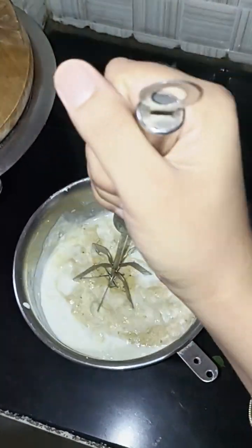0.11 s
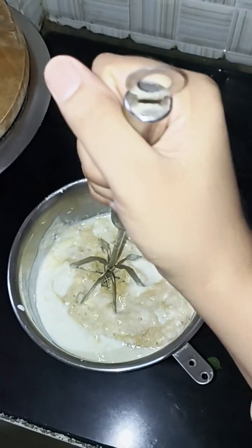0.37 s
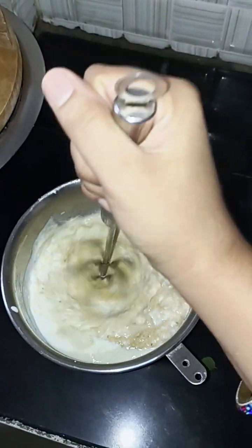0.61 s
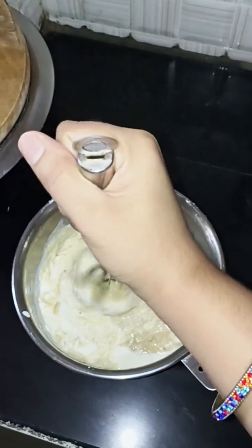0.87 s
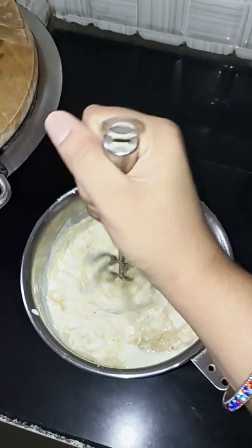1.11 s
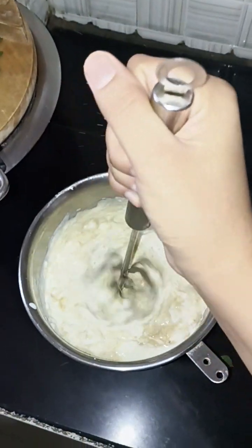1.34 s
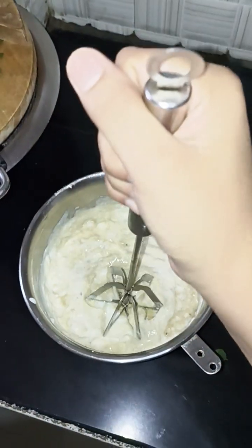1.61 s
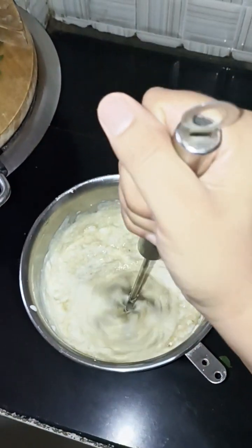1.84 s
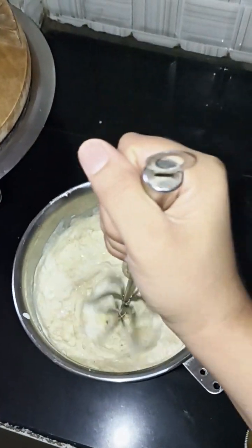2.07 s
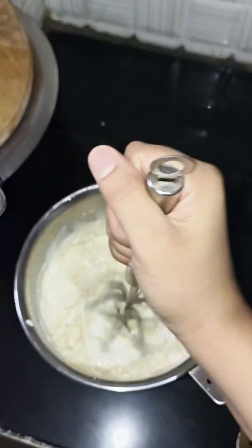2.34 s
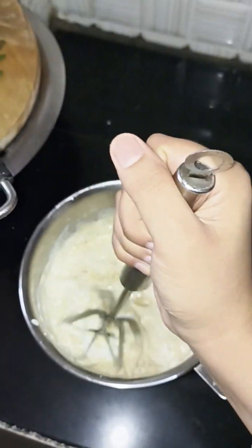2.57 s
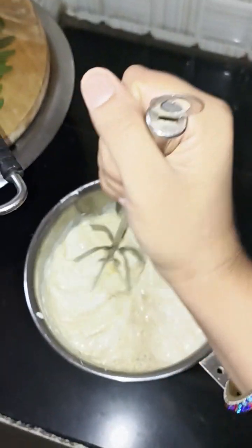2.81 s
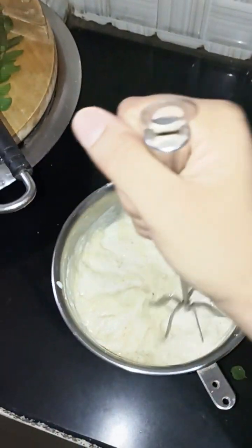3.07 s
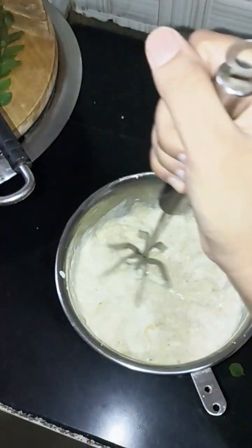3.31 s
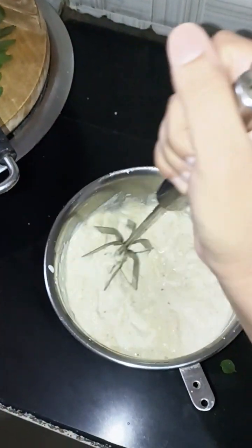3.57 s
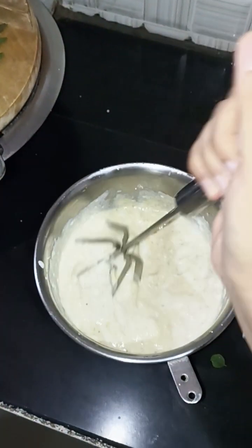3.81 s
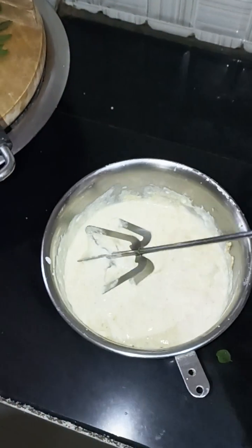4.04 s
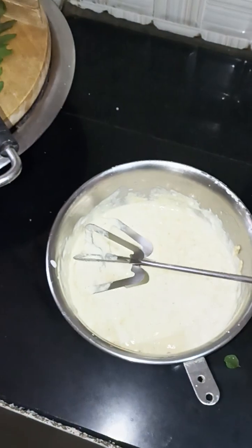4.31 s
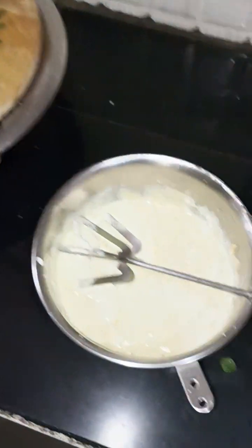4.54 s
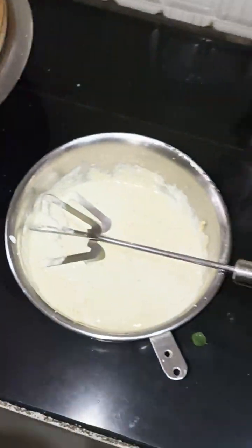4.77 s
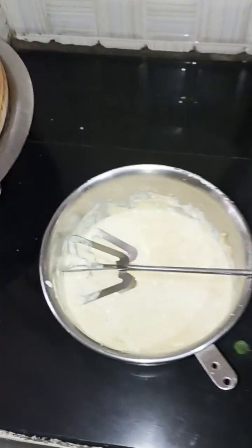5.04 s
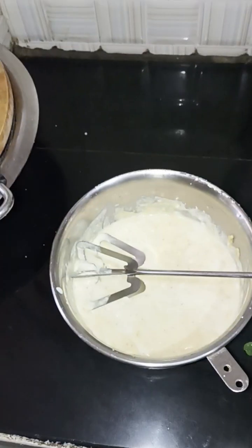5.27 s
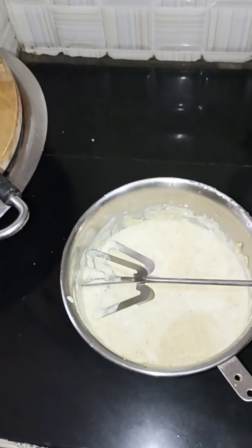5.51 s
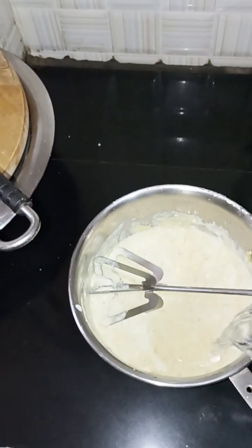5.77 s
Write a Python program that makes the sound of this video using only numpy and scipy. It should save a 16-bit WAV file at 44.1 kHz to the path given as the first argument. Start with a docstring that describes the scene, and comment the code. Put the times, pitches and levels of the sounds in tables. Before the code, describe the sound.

Close stereo phone pickup in a small tiled kitchen: whisk blades tap and rub a batter-damped steel bowl, which judders with low thuds on the counter. Light, irregular contacts build to a rapid hard clatter, then thin to separate clanks and gritty swishes. A final bright metallic clink of the handle on the rim ends the action. A low engine drone swells faintly behind, then fades into quiet hush.

```python
"""Whisking thick batter in a steel bowl

Whisk blades knock, graze and rub a batter-damped bowl on a stone counter: struck modes and uneven hiss.
The bowl judders as filtered random bumps; near the end the steel handle rings on the rim.
A distant engine drones as two wavering tones and a rumble, over street noise in a room mode and a hush.
A small hard-walled kitchen adds banded echoes; a phone listens from above through two ports."""
import sys
import numpy as np
from scipy import signal
from scipy.fft import rfft, irfft, next_fast_len
from scipy.io import wavfile

SR = 44100
rng = np.random.default_rng(int(sys.argv[2]) if len(sys.argv) > 2 else 0)


def wrap_up_sound(samples):
    """Save the sound to the file named by the first command line argument, as 16-bit audio."""
    columns = np.atleast_2d(samples).T
    # keep every value between -1 and 1, then stretch to whole-number steps
    tamed = np.clip(columns, -1, 1)
    steps = np.round(tamed * 32767).astype(np.int16)
    wavfile.write(sys.argv[1], SR, steps)


N = 259749

# Quiet noise of the room: hz, relative_density_db (per Hz)
HUSH_SPECTRUM = [(40, -17), (65, -3), (90, 4), (135, -16), (190, -4.5), (250, -34), (320, -7.5), (480, -16),
                 (750, -12.5), (1370, -17.5), (2570, -15), (3830, -22), (6490, -20), (9220, -26.5),
                 (12100, -18.5), (16000, -20)]
HUSH_DB = -51.5   # rms of the left-right mean
# Likeness of the two ports' sound: hz, likeness (1 = identical)
PORT_LIKENESS = [(60, 1), (180, 0.78), (550, 0.18), (1650, 0.38), (4970, -0.61), (15000, -0.75)]
# Street noise, which feeds rumble and room mode: start_s, level_db
STREET_LEVEL = [(0, -58), (.5, -60.5), (1.7, -54), (3.1, -56.5), (3.5, -58), (4.7, -59.5), (5.89, -66)]
RUMBLE_OVER_STREET_DB, STREET_SWAY_DB = -8, 8
BOOM_HZ, BOOM_WIDTH_HZ = 172.1, 14.5   # the width is that of each of two passes
# Second engine order, climbing as the engine speeds up: start_s, pitch_hz, level_db
ENGINE_REV = [(0.5, 105, -75), (0.7, 107.6, -53), (1.4, 118.7, -56), (2.1, 122, -50.5), (2.85, 124.6, -57),
              (3.3, 122, -64)]
# A steady low order that dies away
IDLE_HZ, IDLE_DB, IDLE_LEAVES_S, IDLE_FADE_DB_PER_S = 84.6, -47.5, 1.25, 6.5
# Vigour of stirring, which drives rocking and grazes: start_s, relative_level_db
STIR_VIGOUR = [(0, -38.5), (.12, -56), (.62, -48), (.68, -42.5), (.8, -44), (.92, -51.5), (1.15, -51.5),
               (1.28, -46.5), (1.42, -47), (1.55, -43), (1.7, -52), (1.88, -55.5), (1.96, -48), (2.08, -41),
               (2.2, -56.5), (2.35, -49.5), (2.42, -52.5), (2.6, -41), (2.95, -34), (3.2, -47.5),
               (3.3, -50.5), (3.6, -48.5), (3.8, -49), (4.0, -52.5), (4.2, -41.5), (4.4, -51),
               (4.82, -49.5), (5.0, -56)]
# Modes of bowl, counter and cupboard below: pitch_hz, width_hz (before widening), relative_level_db
THUD_MODES = [(180.3, 7.8, 10), (218, 7.2, 8), (238.5, 8.4, 6.5), (276.3, 6.8, 1.5), (300.5, 5.5, 5),
              (348.6, 3.5, 8.5), (354, 23, 0), (413, 29, 4.5), (439.5, 8.3, 5.5), (470, 12, 6.5),
              (522, 64, 5.5), (555, 76, 5), (665, 6.7, -10)]
# Modes of the damped bowl wall: pitch_hz, width_hz (before widening), relative_level_db
CLANK_MODES = [(713, 5.1, 15), (740, 58, 19.5), (782, 18, 15.5), (831, 3.4, 13.5), (1010, 39, -20.5),
               (1170, 49, 14), (1290, 24, 2.5), (1480, 61, 8), (1700, 7.7, 5.5), (1910, 156, -4.5),
               (2146, 36, 8), (2510, 35, 1), (2980, 23, 10.5), (3410, 30, 12), (3900, 18, 3)]
GRAZES_PER_S, GRAZE_DB = 150, 4   # small blade touches, over the stirring level
# Blows of the blades: start_s, clank_peak_db, thud_rms_db, tick_rms_db (all before the room),
# thud_hz, strongest_clank_hz, second_clank_hz
KNOCKS = [(0.002, -28.5, -53.5, -59, 198, 707, 1480), (0.191, -16, -36.5, -49, 209, 555, 1393),
          (0.7, -62, -52, -79, 188, 710, 600), (0.706, -31, -55, -57, 186, 4060, 2200),
          (0.741, -51.5, -78, -53, 193, 6480, 5600), (0.927, -35, -65, -64, 190, 2640, 4200),
          (1.031, -31.5, -49.5, -73, 219, 627, 476), (1.372, -24, -64, -51, 246, 4330, 2480),
          (1.514, -42, -61, -70, 192, 2100, 825), (1.631, -30.5, -51.5, -74, 222, 830, 1500),
          (1.935, -41, -62, -82, 487, 2120, 1100), (1.999, -32.5, -59, -63, 185, 3900, 1170),
          (2.212, -35, -59, -66, 180, 4100, 2420), (2.25, -33.5, -65, -65, 340, 3780, 2600),
          (2.342, -54, -58.5, -88, 498, 836, 1480), (2.449, -37.5, -50, -89, 294, 810, 495),
          (2.539, -4, -37, -46, 418, 1777, 785), (2.55, -3, -37, -42.5, 356, 3110, 740),
          (2.578, -30, -42, -54, 480, 830, 2860), (2.665, -10.5, -44, -44, 463, 1573, 3010),
          (2.716, -17, -47, -49, 443, 1645, 803), (2.755, -12.5, -45, -47.5, 470, 1730, 2700),
          (2.804, -8.5, -50, -45.5, 598, 2510, 890), (2.838, -16.5, -45, -48.5, 378, 768, 1690),
          (2.881, -15, -49, -52, 392, 767, 1610), (2.952, -13.5, -47, -47.5, 495, 1910, 1010),
          (3.027, -12, -42, -46, 383, 1476, 3250), (3.047, -33, -51, -67, 350, 1210, 1740),
          (3.065, -19, -43.5, -55, 450, 740, 1650), (3.118, -12.5, -40, -50, 482, 1350, 822),
          (3.193, -24, -41.5, -63, 487, 640, 1136), (3.345, -21.5, -49.5, -59.5, 230, 1016, 1290),
          (3.663, -11.5, -38.5, -50, 245, 1013, 1780), (3.888, -26.5, -48.5, -67, 242, 821, 1590),
          (3.926, -26.5, -54, -59.5, 188, 1180, 1480), (4.032, -33.5, -60, -86, 227, 1010, 1740),
          (4.127, -24, -48.5, -59.5, 321, 1374, 810), (4.277, -31, -47, -82, 304, 822, 1800),
          (4.455, -15, -43.5, -39, 374, 1680, 1440), (4.461, -19, -46, -58, 230, 870, 2370)]
# Heavily damped whisk wires: pitch_hz, width_hz (before widening), relative_level_db
TICK_MODES = [(5000, 240, -9.5), (6030, 530, 4), (9800, 850, -3.5), (12170, 930, -1.5), (15200, 650, -17)]
# Stiff wires, ringing briefly when struck: pitch_hz, width_hz, relative_level_db
WIRE_MODES = [(4330, 29, -7), (4790, 290, -8), (4590, 100, 11), (5800, 110, -17), (8000, 70, -13),
              (8050, 160, 12)]
WIRE_SHARE = 0.34
BOUNCES_PER_S, BOUNCE_S, BOUNCE_SHARE = 700, 0.008, 0.8   # several blades land in a quick dying run
BATTER_DETUNE, LEAST_DAMPING = 0.012, 0.016   # batter shifts and damps the modes, as shares of pitch
# Strongest and second clank against the rest of the wall; their width over pitch
STRONG_SHARE, SECOND_SHARE, MODE_DAMPING = 0.86, 0.46, 0.059
SOFT_TICK_DB = -29   # tick under clank for a blow of middling hardness
# Blade strokes along the wall: middle_s, length_s, relative_level_db
STROKES = [(0.754, 0.34, -52), (0.865, 0.41, -57), (1.292, 0.13, -52), (1.434, 0.31, -49.5),
           (1.521, 0.07, -46.5), (1.654, 0.13, -57), (2.016, 0.29, -53), (2.093, 0.16, -58),
           (2.548, 0.16, -45.5), (2.62, 0.55, -50), (2.913, 0.63, -47), (3.315, 0.2, -45),
           (3.41, 0.18, -54), (3.483, 0.15, -42.5), (3.62, 0.19, -45.5), (3.72, 0.2, -56),
           (3.786, 0.1, -44.5), (3.922, 0.12, -48), (4.087, 0.16, -48), (4.199, 0.33, -50)]
# Colour of the rubbing: hz, relative_density_db (per Hz)
RUB_SPECTRUM = [(500, -41), (900, -2.5), (1800, -2), (2800, 5), (4200, -5), (6500, -0.5), (9000, -10),
                (10800, -10), (12300, -1), (15000, -11.5), (17000, -25)]
GRIT_PER_S, GRIT_SHARE, GRIP_DB = 2500, 0.3, 1.2   # fine catches in a stroke; how unevenly it grips
# Steel handle laid on the rim: start_s, peak_db (before the room)
HANDLE_DROP = (4.455, -11)
# Modes of the handle's tube: pitch_hz, width_hz (before widening), relative_level_db
HANDLE_MODES = [(6050, 55, -10), (6400, 50, -27), (6550, 26, 5), (6530, 100, 1), (8370, 63, -1.5),
                (10200, 120, -12), (13200, 70, -13), (13300, 70, -15), (14800, 83, -17)]
# Reverberation of the kitchen: hz, t60_s
KITCHEN_DECAY = [(500, 0.25), (1500, 0.27), (4000, 0.27), (12000, 0.17)]
# Wandering of the whisk across the bowl: start_s, left_minus_right_db
WHISK_SIDE = [(0, -0.5), (1.5, -2.5), (2.5, -2.5), (3.2, -1), (3.7, 1.5), (4.2, -2.5), (4.6, -2)]
# Colour difference of the ports, one shaded by the hand: hz, left_minus_right_db
PORT_BALANCE = [(60, -16), (150, 9), (380, -5.5), (950, 5), (2380, -2.5), (5980, -3), (15000, 22.5)]
RIGHT_LAG_S = 0.00043   # the right port lies farther off


def from_db(db):
    """Decibels express an amplitude ratio on a logarithmic scale."""
    return 10 ** (np.asarray(db) / 20)


def rms_one(x):
    """Dividing by the root mean square gives unit effective amplitude."""
    return x / np.sqrt(np.mean(x ** 2) + 1e-20)


def in_time(rows):
    """Linear interpolation in time turns breakpoints into continuous curves."""
    s, *columns = np.transpose(rows)
    return [np.interp(np.arange(N) / SR, s, c) for c in columns]


def at_hz(points, hz):
    """Interpolation over log frequency follows equal musical intervals."""
    point_hz, value = np.transpose(points)
    return np.interp(np.log(hz), np.log(point_hz), value)


def drift(rate_hz):
    """Low-passed noise is a slow random fluctuation, here of unit spread."""
    r = np.exp(-80 * np.pi * rate_hz / SR)   # one step every 40 samples
    steps = rng.standard_normal(N // 40 + 2002)
    slow = signal.lfilter([1], [1, -2 * r, r * r], steps)[2000:]   # past the filter's start
    return np.interp(np.arange(N) / 40, np.arange(len(slow)), rms_one(slow))


def band(x, low_hz, high_hz):
    """A band-pass filter keeps the energy between two frequencies."""
    edges_hz = [low_hz, min(high_hz, .45 * SR)]
    return signal.sosfilt(signal.butter(2, edges_hz, "band", fs=SR, output="sos"), x)


def resonance(x, hz, width_hz):
    """A damped oscillator has two poles; its response peaks at gain 1, at least 5 Hz wide."""
    r = np.exp(-np.pi * max(width_hz, 5) / SR)
    poles = [1, -2 * r * np.cos(2 * np.pi * hz / SR), r * r]
    return signal.lfilter([(1 - r * r) / 2, 0, (r * r - 1) / 2], poles, x)


def body(x, modes, widen, spread_db=0., detune=0.):
    """Modal superposition: parallel modes of alternating sign, with chance strengths and shifts."""
    luck, shift = rng.normal(0, 1, (2, len(modes)))
    total = 0
    for k, (hz, width_hz, db) in enumerate(modes):
        gain = (-1) ** k * from_db(db + spread_db * luck[k])
        total = total + gain * resonance(x, hz * (1 + detune * shift[k]), widen * width_hz)
    return total


def two_ports(mid, side, alike):
    """Mid and side noise, weighted in power, set the correlation of two channels."""
    return np.sqrt(1 + alike) * mid + np.sqrt(1 - alike) * side * [[1], [-1]]


def banded_noise(spectrum, patchy_db, alike_share):
    """Spectral shaping by narrow noise bands, each with its own level, flicker and likeness."""
    out, edges_hz = 0, 45 * 2 ** np.arange(0, 8.8, .4)
    white = rng.standard_normal((2, 2, N))   # neighbouring bands use different noise
    for k, (low, high) in enumerate(zip(edges_hz, edges_hz[1:])):
        mid, side = band(band(white[k % 2], low, high), .8 * low, 1.25 * high)
        hz = np.sqrt(low * high)
        alike = np.clip(alike_share + at_hz(PORT_LIKENESS, hz), 0, 1)
        gain = from_db(at_hz(spectrum, hz) + patchy_db * drift(8.0))
        out = out + gain * two_ports(mid, side, alike)
    return out


def room_hush():
    """Broadband noise: many faint sources merge into a coloured, flickering hush."""
    noise = banded_noise(HUSH_SPECTRUM, patchy_db=1.54, alike_share=0)
    return from_db(HUSH_DB) * noise / np.std(noise.mean(axis=0))


def boom():
    """Room resonance: street noise excites one low mode of the air."""
    air = rng.standard_normal(N)
    for _ in range(2):
        air = resonance(air, BOOM_HZ, BOOM_WIDTH_HZ)
    return from_db(in_time(STREET_LEVEL)[0]) * rms_one(air)


def engine():
    """Periodic firing gives tonal orders: two wavering low sines, over a rumble of filtered noise."""
    t = np.arange(N) / SR
    idle = IDLE_HZ, IDLE_DB - IDLE_FADE_DB_PER_S * np.maximum(t - IDLE_LEAVES_S, 0)
    orders = 0
    for hz, db in (idle, in_time(ENGINE_REV)):
        phase = 2 * np.pi * np.cumsum(hz + 2.37 * drift(9.0)) / SR
        orders = orders + np.sqrt(2) * from_db(db + 2.6 * drift(5.3)) * np.sin(phase)
    rumble = rms_one(band(band(rng.standard_normal(N), 48, 206), 87, 211))
    street_db = in_time(STREET_LEVEL)[0]
    return orders + from_db(street_db + RUMBLE_OVER_STREET_DB + STREET_SWAY_DB * drift(0.53)) * rumble


def rocking(level_db):
    """Random impulsive excitation: juddering on stone sends uneven soft bumps into the low modes."""
    bumps = (rng.random(N) < 400. / SR) * rng.standard_normal(N)
    bumps = bumps * from_db(level_db + 1.26 * drift(6.3)) + 1e-18
    return from_db(31.0) * band(body(bumps, THUD_MODES, widen=2.92), 162, 623)


def grazes(level_db):
    """Damped modal response: blade tips touch the wall faintly at random, dulled by the batter."""
    touches = (rng.random(N) < GRAZES_PER_S / SR) * rng.standard_normal(N)
    touches = touches * from_db(level_db + GRAZE_DB) + 1e-18
    return from_db(13) * body(band(touches, 400, 1500), CLANK_MODES, widen=7)


def thud_of(shove, thud_hz):
    """Low modes answer a shove most strongly near the pitch of the blow."""
    under = [(hz, width, db - 9.0 * abs(np.log2(hz / thud_hz))) for hz, width, db in THUD_MODES]
    thud = rms_one(body(shove, under, widen=1.3, spread_db=4, detune=BATTER_DETUNE))
    return rms_one(thud + 0.5 * rms_one(resonance(shove, thud_hz, width_hz=27)))


def clank_of(click, strong_hz, second_hz, hardness):
    """Selective excitation: modes near two pitches wake most, and harder blows crack higher up."""
    near = []
    for hz, width_hz, db in CLANK_MODES:
        octaves_off = min(abs(np.log2(hz / strong_hz)), abs(np.log2(hz / second_hz)))
        near.append((hz, max(width_hz, LEAST_DAMPING * hz), db - 9.2 * octaves_off))
    clank = rms_one(body(click, near, widen=1.8, spread_db=4.5, detune=BATTER_DETUNE))
    for share, hz in ((STRONG_SHARE, strong_hz), (SECOND_SHARE, second_hz)):
        clank = clank + share * rms_one(resonance(click, hz, MODE_DAMPING * hz))
    clank = clank + 0.73 * rms_one(band(click, 617, 1660))
    clank = clank + 0.27 * hardness * rms_one(band(click, 900, 3070))
    return clank / np.abs(clank).max()


def tick_of(click, t):
    """Heavily damped wires turn a dying rattle into a tick; stiff wires ring briefly."""
    rattle = rng.standard_normal(len(t)) * (np.exp(-t / 0.00065) + 0.91 * np.exp(-t / 0.0086))
    tick = rms_one(body(rattle, TICK_MODES, widen=1.5, spread_db=2))
    wires = rms_one(body(click, WIRE_MODES, widen=1, spread_db=6.0, detune=BATTER_DETUNE))
    return rms_one(tick + WIRE_SHARE * wires)


def knocks():
    """Impact excitation: each contact wakes a thud below, and a clank and a tick of wall and wires."""
    thuds, clacks, t = np.zeros(N), np.zeros(N), np.arange(int(.35 * SR)) / SR
    shove = band(np.exp(-t / 0.00013), 200, 830)   # the blow as the counter feels it
    for s, clank_db, thud_db, tick_db, thud_hz, strong_hz, second_hz in KNOCKS:
        bounces = (rng.random(len(t)) < BOUNCES_PER_S / SR) * rng.standard_normal(len(t))
        bounces = bounces * np.exp(-t / BOUNCE_S)
        click = signal.unit_impulse(len(t)) + BOUNCE_SHARE * bounces + 1e-18
        hardness = from_db(3.2 * (tick_db - clank_db - SOFT_TICK_DB))   # much tick means a hard blow
        thud = from_db(thud_db) * thud_of(shove, thud_hz)
        clank = from_db(clank_db) * clank_of(click, strong_hz, second_hz, hardness)
        tick = from_db(tick_db) * tick_of(click, t)
        at = round(s * SR)
        thuds[at:at + len(t)] += thud
        clacks[at:at + len(t)] += clank + tick
    return thuds, clacks


def rubbing():
    """Sliding friction: blades on wet steel give uneven hiss with fine grit in it."""
    t = np.arange(N) / SR
    pressure = 0
    for middle_s, length_s, db in STROKES:
        swell = np.cos(np.pi * np.clip((t - middle_s) / length_s, -.5, .5)) ** 2
        pressure = pressure + from_db(db) * swell
    hiss = banded_noise(RUB_SPECTRUM, patchy_db=3.0, alike_share=0.1)
    catches = (rng.random(N) < GRIT_PER_S / SR) * rng.standard_normal(N) * rng.exponential(1, N) + 1e-18
    grit = rms_one(band(catches, 2700, 13900))
    late_grit = np.interp(t - RIGHT_LAG_S, t, grit)
    grip = from_db(GRIP_DB * drift(40))
    return pressure * grip * (rms_one(hiss) + GRIT_SHARE * np.array([grit, late_grit]))


def handle():
    """Impulse response of a tube: one blow on the rim sets its bright modes ringing."""
    s, peak_db = HANDLE_DROP
    ring = body(signal.unit_impulse(N, round(s * SR)) + 1e-18, HANDLE_MODES, widen=1.5)
    return from_db(peak_db) * ring / np.abs(ring).max()


def kitchen(x):
    """Reverberation: close hard walls give dense echoes, dying band by band, more alike in the bass."""
    t, edges_hz = np.arange(int(.5 * SR)) / SR, 400 * 2 ** np.arange(0, 6.5)
    white, echoes = rng.standard_normal((2, 2, len(t))), 0
    for k, (low, high) in enumerate(zip(edges_hz, edges_hz[1:])):
        mid, side = band(white[k % 2], low, high)
        hz = np.sqrt(low * high)
        both = two_ports(mid, side, np.clip(at_hz(PORT_LIKENESS, hz), 0, 1))
        echoes = echoes + both * from_db(-60 * t / at_hz(KITCHEN_DECAY, hz))
    onset = 1 - np.exp(-(t / 0.0005) ** 2)
    early = 1 + 0.44 * np.exp(-t / 0.0034)   # counter and tiles answer first and loudest
    echoes = echoes * onset * early
    echoes = echoes / np.sqrt(np.sum(echoes ** 2) / 2)
    return signal.fftconvolve(x[None], echoes, axes=1)[:, :N]


def ports(x):
    """Linear filtering: each port has its own frequency response, and so its own colour."""
    size = next_fast_len(N + 4096)
    hz = np.maximum(np.fft.rfftfreq(size, 1 / SR), 1)
    tilt = from_db(np.outer([.5, -.5], at_hz(PORT_BALANCE, hz)))
    return irfft(rfft(x, size) * tilt, size)[:, :N]


def scene():
    """Superposition: direct and reflected bowl sounds reach the ports, over the background."""
    stir_db, = in_time(STIR_VIGOUR)
    thuds, clacks = knocks()
    clacks = clacks + handle() + grazes(stir_db)
    counter = thuds + rocking(stir_db)   # a wide source, equally far from both ports
    late = np.interp(np.arange(N) - RIGHT_LAG_S * SR, np.arange(N), clacks)
    echoes = kitchen(from_db(-3.5) * clacks + from_db(-7.0) * thuds)
    hush = room_hush()
    whisk = np.array([clacks, late]) + counter + echoes + rubbing()
    side = from_db(np.outer([.5, -.5], in_time(WHISK_SIDE)[0]))
    return ports(side * whisk) + engine() + boom() + hush


def low_pass(x):
    """Removes everything above the highest recorded frequency."""
    return signal.sosfilt(signal.butter(12, 16810, fs=SR, output="sos"), x)


def record(dry):
    """Saturation rounds the peaks; limited bandwidth cuts the deep bass and the top."""
    mix = .85 * np.tanh(dry / .85)
    mix = signal.sosfilt(signal.butter(1, 55, "high", fs=SR, output="sos"), mix)
    mix = signal.sosfilt(signal.butter(8, 15800, fs=SR, output="sos"), mix)
    return low_pass(mix)


dry = scene()
out = record(dry)
wrap_up_sound(out)
```